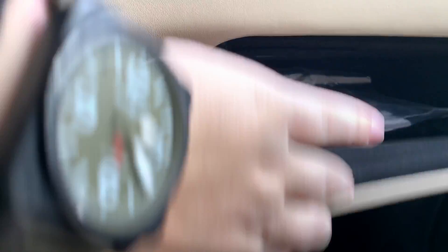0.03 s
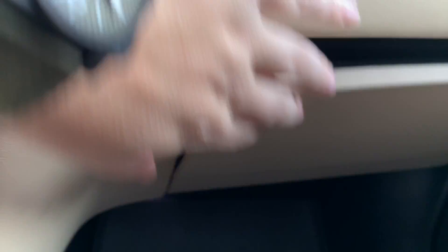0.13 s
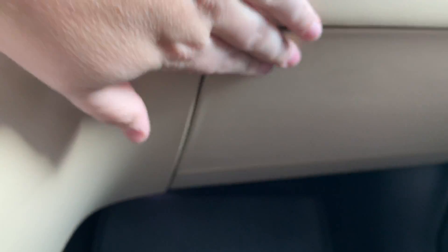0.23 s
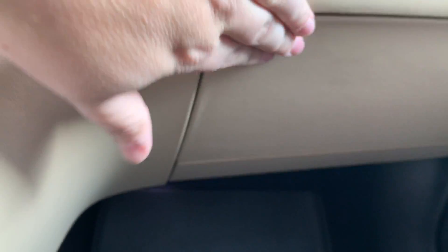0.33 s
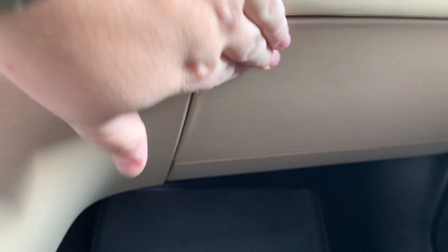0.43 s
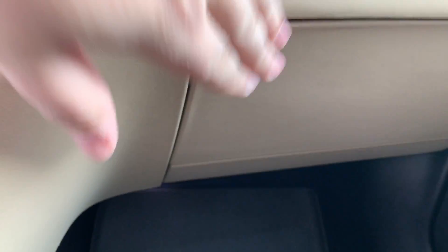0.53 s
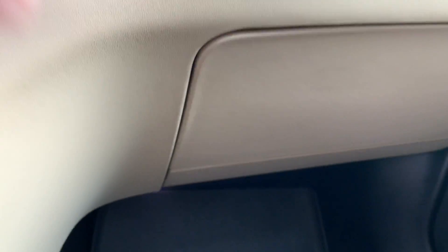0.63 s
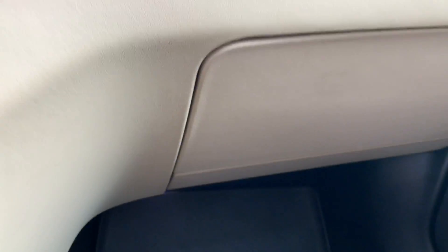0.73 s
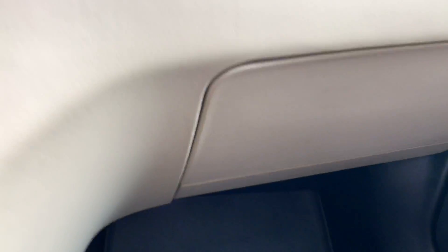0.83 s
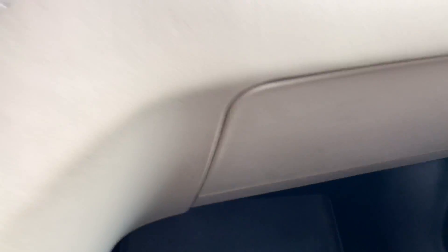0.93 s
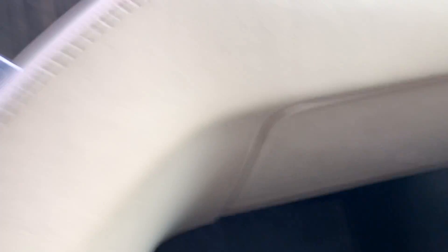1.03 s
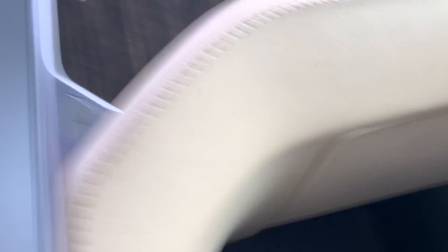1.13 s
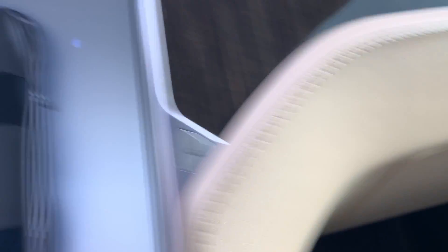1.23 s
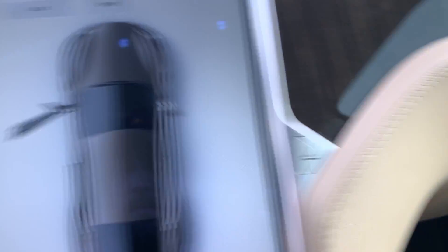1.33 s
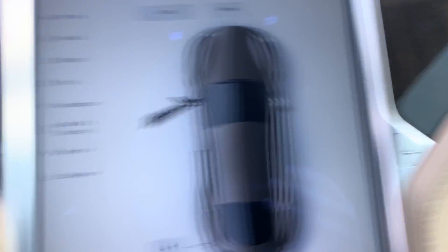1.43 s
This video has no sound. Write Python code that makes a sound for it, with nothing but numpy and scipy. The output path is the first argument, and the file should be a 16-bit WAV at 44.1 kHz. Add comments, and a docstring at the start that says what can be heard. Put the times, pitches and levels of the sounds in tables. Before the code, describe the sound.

A car glovebox is shut, heard close in stereo inside a parked cabin with steady low rumble and hum. Faint movement rustles first; at 0.2 s the plastic lid knocks and chatters, at 0.26 s the latch snaps brightly, with a boxy thump and faint spring ring. Dashboard shudder fades, fingers slide off near 0.45 s; tiny trim ticks follow from 0.7 s, and soft rustle rises by 1.4 s.

```python
"""A low cabin rumble and hum is heard first, under the rustle of movement in a parked car.
A plastic glovebox lid knocks against its stops, then the latch snaps home and its spring rings faintly.
The box thumps, the dashboard shudders, a faint ring swells, fingers slide off the lid and the trim ticks.
Rumble, rustle, slide and clatter are noise shaped in frequency bands; hum is wavering sines;
lid, latch, thumps and after-rings are sums of decaying sinusoidal modes."""
import sys
import numpy as np
from scipy import signal
from scipy.io import wavfile

SR = 44100
rng = np.random.default_rng(int(sys.argv[2]) if len(sys.argv) > 2 else 0)


def materialize(psi):
    """Save the field psi as 16-bit PCM at rate SR to the path in sys.argv[1].

    A 1-D psi becomes a single channel; in a 2-D psi each row is a channel.
    """
    bounded = np.clip(np.atleast_2d(psi).T, -1, 1)
    quanta = np.round(bounded * 32767).astype(np.int16)
    wavfile.write(sys.argv[1], SR, quanta)


N = 66150
T = np.arange(N) / SR  # time in s

# Steady rumble spectrum: pitch_hz, relative_density_db (dB per Hz)
RUMBLE_COLOUR = [(25, -33.5), (33, -24), (48, -2), (75, 2.5), (115, -12.5), (180, -17), (330, -22),
                 (600, -26), (1200, -34.5), (2500, -40), (6000, -48), (9000, -56.5), (15000, -62)]
# Left-right correlation of the cabin's sounds: pitch_hz, correlation (-1 to 1)
CABIN_CORRELATION = [(60, 1), (130, 0.8), (290, .88), (640, 0.4), (1400, 0.41), (15000, 0.083)]
# Hum lines: pitch_hz, level_db (mean rms, before pan), left_right_db
HUM_LINES = [(81.4, -46, 0), (268.2, -52, 8), (405.5, -67, 13)]
# Equal balance at every pitch: pitch_hz, left_right_db
CENTRE_BALANCE = [(20, 0), (20000, 0)]
# Rustle of movement: start_s, body_level_db, hiss_level_db
RUSTLE_LEVELS = [(0, -56, -64), (0.06, -56.5, -63), (0.11, -50, -54.5), (0.17, -50, -52), (0.2, -35.5, -57),
                 (0.3, -53.5, -72), (0.6, -62, -72.5), (0.75, -55, -70.5), (0.99, -69.5, -80),
                 (1.09, -55.5, -84.5), (1.21, -56.5, -73.5), (1.31, -53, -58.5), (1.41, -54, -49),
                 (1.48, -49.5, -47)]
# Spectrum of the rustle's body: pitch_hz, relative_density_db (dB per Hz)
RUSTLE_BODY_COLOUR = [(150, 3), (500, -3), (1000, 3), (2000, -0.5), (4000, -6), (6800, -8.5), (8700, -11),
                      (15000, -42)]
# Spectrum of the rustle's high hiss: pitch_hz, relative_density_db (dB per Hz)
RUSTLE_HISS_COLOUR = [(1000, -20), (4000, -7.5), (7000, -2), (10000, -0.5), (12000, 4.5), (15200, -2.5)]
# The lid meets its stops and chatters: start_s, clatter_db, push_db (relative drive of the lid's modes)
KNOCK_CONTACTS = [(0.2042, -17.5, 0.5), (0.2096, -14, -24.5), (0.2125, -13.5, -19.5),
                  (0.2223, -23.5, -24.5), (0.2273, -26, -23)]
# The latch rides over the striker and drops in: start_s, clatter_db, push_db (on the lid's modes)
SNAP_CONTACTS = [(0.2555, -16.5, -33), (0.2578, -10.5, -13.5), (0.262, -11.5, -27), (0.2644, -9, -32),
                 (0.2705, -29, -10.5), (0.291, -38, -36)]
# Modes of lid and box: pitch_hz, relative_level_db, t60_s, left_right_db
LID_RESONANCES = [(125, -20, 0.18, -2), (188, -16.5, 0.18, -3), (275, -18.5, 0.055, -6), (335, -13, .06, 4),
                  (368.7, -19, 0.11, 7.5), (436, -20, 0.023, 0.5), (483, -15.5, .06, -1.5),
                  (531, -18.5, 0.12, 5.5), (597.3, -13, 0.073, 3.5), (826.5, -16.5, 0.079, 0),
                  (987, -24, .1, -4.5), (1066.6, -20.5, 0.1, 4), (1589, -32, 0.21, -1),
                  (2592, -29, 0.18, -3)]
# Modes of the latch and its spring: pitch_hz, relative_level_db, t60_s, left_right_db
LATCH_RESONANCES = [(1077, -49.5, 0.91, 8), (1492, -21, 0.067, 12), (1977, -21, .085, 11.5),
                    (2200, -19.5, 0.067, -8), (2210, -51.5, 0.94, -1.5), (2340, -25.5, 0.089, -0.5),
                    (2583, -27, 0.089, -3.5), (2987, -24, 0.12, 9.5), (3870, -25, .075, -6.5),
                    (3940, -53, .5, -3.5), (3990, -49.5, 0.45, -3), (4760, -59, 1, -10.5),
                    (6340, -48, .6, 0), (6400, -54.5, 1, -10.5), (6525, -52, 1, 0.5), (6640, -59, .5, -4)]
# Dense ringing of the plastic at the stops: pitch_hz, relative_density_db (dB per Hz)
KNOCK_SPECTRUM = [(60, -14), (270, -2), (500, -5), (750, -8), (1250, -11), (1800, -3.5), (3500, -14.5),
                  (6500, -9.5), (8700, -16), (11000, -16), (13300, -24), (15500, -26)]
# Dense ringing of the plastic at the latch: pitch_hz, relative_density_db (dB per Hz)
SNAP_SPECTRUM = [(60, -15), (200, -15), (400, -7.5), (750, -5.5), (1250, -4.5), (2000, -1), (3500, -3.5),
                 (6500, -2.5), (8700, -4.5), (10500, -10.5), (13300, -20.5), (15500, -17)]
# Decay of the knocks' clatter: pitch_hz, t60_s
KNOCK_DECAY = [(100, .1), (1000, 0.11), (5000, 0.095), (14000, 0.057)]
# Decay of the latch's clatter: pitch_hz, t60_s
SNAP_DECAY = [(100, 0.42), (1000, 0.076), (5000, 0.069), (14000, 0.015)]
# Balance of the clatter: pitch_hz, left_right_db
CLATTER_BALANCE = [(100, 8), (400, 3), (1200, 5.5), (2400, 1), (4500, -5), (9000, 0), (15000, 2)]
# Left-right correlation of the clatter: pitch_hz, correlation (-1 to 1)
CLATTER_CORRELATION = [(100, .98), (400, .9), (1000, 0.26), (2200, -0.33), (5000, -0.011), (12000, -0.2)]
# Box and shut-in air, then the dashboard: start_s, pitch_hz, level_db (before rise and decay), rise_s, t60_s
THUMP_MODES = [(0.2135, 87.3, -8.5, 0.0078, 0.13), (0.266, 95.7, -9.5, .004, 0.056),
               (0.2685, 360, -9.5, 0.0046, 0.023), (0.303, 109, -18.5, 0.004, 0.07),
               (0.329, 46.3, -24, 0.0053, 0.45), (0.418, 50.8, -24, 0.0058, 0.21)]
# Ring as the hand lets go: start_s, pitch_hz, level_db (before rise and decay), rise_s, t60_s
AFTER_RING_MODES = [(0.388, 823.6, -47, 0.01, 0.56), (0.415, 1842, -55, 0.0081, 0.37),
                    (0.555, 808, -47, 0.009, 0.56)]
# Spectrum of the fingers' slide: pitch_hz, relative_density_db (dB per Hz)
SLIDE_SPECTRUM = [(500, -1), (2000, -12), (4000, -4.5), (7000, -2), (10500, 1), (15500, -6)]
# Small ticks of the trim: start_s, clatter_db
TRIM_TICKS = [(0.707, -45), (0.734, -49.5), (1.066, -49), (1.191, -49.5), (1.281, -46), (1.321, -47.5),
              (1.474, -42.5)]
# Spectrum of the ticks: pitch_hz, relative_density_db (dB per Hz)
TICK_SPECTRUM = [(200, -1.5), (1000, 8), (2000, -6.5), (4000, -3.5), (9000, -26), (15000, -27)]
# Decay of the ticks: pitch_hz, t60_s
TICK_DECAY = [(200, 0.13), (8000, 0.04)]
# Dips in the microphone's treble response: pitch_hz, width_hz, gain_db
TREBLE_DIPS = [(8750, 1000, -14), (13150, 700, -14), (13700, 700, -16)]

RUMBLE_DB = -38
HUM_WAVER_DB, HUM_WANDER_RAD = -2, 0.098  # random spread of level and phase
RUSTLE_GRAIN_DB, RUSTLE_GRAINS_PER_S = 2, 130
RIGHT_LAG_S = .00024  # the cabin's sounds reach the right side later
TAIL_DB, TAIL_T60_S = -44, .25  # the cabin's faint answer, relative to each contact
CRACK_DB, CRACK_T60_S = -2.5, 0.0047  # the instant of each contact, relative to its level
CRACKLE_DB, CRACKLE_PER_S = 0.5, 380  # tiny collisions roughen the clatter
BEND_DELAY_S, BEND_REFERENCE_HZ = .0045, 489.8  # group delay of bending waves at the reference pitch
RISE_CYCLES = 0.45  # time constant of a mode's build-up
DROP_S = .2585  # the latch drops behind the striker
SLIDE_S, SLIDE_WIDTH_S, SLIDE_DB = 0.446, 0.02, -50.5
STOPBAND_HZ = 16300


def from_db(db):
    """The decibel law: level in dB to amplitude gain; twice the level gives the power ratio."""
    return 10 ** (np.asarray(db) / 20)


def at_hz(points, hz):
    """Logarithmic pitch scale: interpolate a table along log frequency."""
    points = np.array(points)
    return np.interp(np.log(hz), np.log(points[:, 0]), points[:, 1])


def pan(db):
    """Intensity stereo: a level difference shared equally between left and right."""
    return from_db(np.array([[.5], [-.5]]) * db)


def drift(points_per_s):
    """Random modulation: Gaussian values of unit spread joined by straight lines."""
    return np.interp(T * points_per_s, np.arange(1024), rng.standard_normal(1024))


def decay(hits, t60):
    """Exponential decay: summed power of hits (start_s, level_db), each losing 60 dB in t60."""
    power = 0
    for start_s, db in hits:
        fade_db = 60 * np.clip((T - start_s) / t60, 0, 4)
        power = power + (T >= start_s) * from_db(2 * (db - fade_db))
    return power


def noise(colour, correlation, balance=CENTRE_BALANCE, envelope=lambda hz: 1):
    """Band-filtered noise, near unit rms before envelope and pan, with partial left-right correlation."""
    edges = np.geomspace(22, 17000, 27)
    white = rng.standard_normal((2, 2, N + 8000))  # the extra samples let the filters settle
    out, power = 0, 0
    for k, (low, high) in enumerate(zip(edges, edges[1:])):
        band = signal.butter(2, [low, high], "band", fs=SR, output="sos")
        # neighbouring bands draw on independent noise
        mid, side = signal.sosfilt(band, white[k % 2])[:, -N:]
        hz = np.sqrt(low * high)
        alike = np.clip(at_hz(correlation, hz), -.99, .99)
        gain = from_db(at_hz(colour, hz))
        pair = np.sqrt(1 + alike) * mid + np.sqrt(1 - alike) * np.array([side, -side])
        out = out + gain * envelope(hz) * pan(at_hz(balance, hz)) * pair
        power += gain ** 2 * (high - low) * 4 / SR
    return out / np.sqrt(power)


def rumble():
    """Broadband stationary noise: a steady low-frequency spectrum fills the cabin."""
    return from_db(RUMBLE_DB) * noise(RUMBLE_COLOUR, CABIN_CORRELATION)


def hum():
    """Random modulation of pure tones: a few lines waver in level and phase."""
    out = 0
    for hz, db, pan_db in HUM_LINES:
        amplitude = np.sqrt(2) * from_db(db + HUM_WAVER_DB * drift(8))
        phase = 2 * np.pi * hz * T + HUM_WANDER_RAD * drift(6.6)
        out = out + pan(pan_db) * amplitude * np.sin(phase)
    return out


def rustle():
    """Friction noise: an arm's movement gives a grainy body and a smoother high hiss."""
    start_s, body_db, hiss_db = np.transpose(RUSTLE_LEVELS)
    grain_db = RUSTLE_GRAIN_DB * drift(RUSTLE_GRAINS_PER_S)
    body_gain = from_db(np.interp(T, start_s, body_db) + grain_db)
    body = body_gain * noise(RUSTLE_BODY_COLOUR, CABIN_CORRELATION)
    hiss = from_db(np.interp(T, start_s, hiss_db)) * noise(RUSTLE_HISS_COLOUR, CABIN_CORRELATION)
    return body + hiss


def clatter(hits, colour, t60s):
    """High modal density: contacts crack, ring countless modes as decaying noise and leave a faint tail."""
    tail = from_db(2 * TAIL_DB) * decay(hits, TAIL_T60_S)
    crack = from_db(2 * CRACK_DB) * decay(hits, CRACK_T60_S)
    crackle = from_db(2 * CRACKLE_DB * drift(CRACKLE_PER_S))

    def envelope(hz):
        """Energies add: amplitude is the root of the summed powers."""
        return np.sqrt(crack + crackle * decay(hits, at_hz(t60s, hz)) + tail)

    return noise(colour, CLATTER_CORRELATION, CLATTER_BALANCE, envelope)


def ring(hits, modes):
    """Modal superposition: each hit excites all modes, with random strengths and dispersive phase lags."""
    out = np.zeros((2, N))
    spread_db = rng.normal(0, 1, (len(hits), len(modes)))
    for (start_s, db), spread in zip(hits, spread_db):
        age = np.maximum(T - start_s, 0)
        for k, (hz, mode_db, t60, pan_db) in enumerate(modes):
            fade_db = 60 * np.minimum(age / t60, 4)
            rise = 1 - np.exp(-age * hz / RISE_CYCLES)
            envelope = from_db(db + mode_db + spread[k] - fade_db) * rise
            # bending-wave phase grows as the root of frequency
            lag_cycles = 2 * BEND_DELAY_S * np.sqrt(hz * BEND_REFERENCE_HZ)
            out += pan(pan_db) * envelope * np.sin(2 * np.pi * (hz * age - lag_cycles))
    return out


def lid():
    """Impact excitation: knocks on the stops ring the lid, and the latch jolts its modes again."""
    knocks, contacts = np.array(KNOCK_CONTACTS), np.array(KNOCK_CONTACTS + SNAP_CONTACTS)
    knocking = clatter(knocks[:, :2], KNOCK_SPECTRUM, KNOCK_DECAY)
    return knocking + ring(contacts[:, ::2], LID_RESONANCES)


def swells(modes):
    """Transient resonance: each sinusoid builds up exponentially, then dies away."""
    out = 0
    for start_s, hz, db, rise_s, t60 in modes:
        age = np.maximum(T - start_s, 0)
        rise = 1 - np.exp(-age / rise_s)
        fade = np.exp(-np.log(1000) * age / t60)
        out = out - from_db(db) * rise * fade * np.sin(2 * np.pi * hz * age)
    return out


def thumps():
    """Low-frequency resonance: box and shut-in air thump, then the dashboard shudders."""
    return swells(THUMP_MODES)


def latch():
    """Impact and free vibration: bright contacts, then the drop sets catch and spring ringing."""
    snapping = clatter(np.array(SNAP_CONTACTS)[:, :2], SNAP_SPECTRUM, SNAP_DECAY)
    return snapping + ring([(DROP_S, 0)], LATCH_RESONANCES)


def after_rings():
    """Lightly damped resonance: a faint ring swells as the hand lets go."""
    return swells(AFTER_RING_MODES)


def slide():
    """Sliding friction: fingers leave the lid in one bell-shaped burst of noise."""
    swell = np.exp(-.5 * ((T - SLIDE_S) / SLIDE_WIDTH_S) ** 2)
    return from_db(SLIDE_DB) * swell * noise(SLIDE_SPECTRUM, CABIN_CORRELATION)


def ticks():
    """Small impacts: the trim ticks in short bursts of decaying noise."""
    return clatter(TRIM_TICKS, TICK_SPECTRUM, TICK_DECAY)


def scene():
    """Superposition and interaural delay: the cabin's sounds lag on the right, the glovebox does not."""
    left, right = rumble() + hum() + rustle() + slide() + ticks()
    around = np.array([left, np.interp(T - RIGHT_LAG_S, T, right)])
    return around + lid() + thumps() + latch() + after_rings()


def record(dry):
    """Linear filtering and saturation: the microphone dips in the treble, clips peaks and cuts the top."""
    for hz, width_hz, db in TREBLE_DIPS:
        b, a = signal.iirpeak(hz, hz / width_hz, fs=SR)
        dry = dry + (from_db(db) - 1) * signal.lfilter(b, a, dry)
    low_pass = signal.cheby2(20, 60, STOPBAND_HZ, fs=SR, output="sos")  # 60 dB down at the edge
    return signal.sosfilt(low_pass, np.clip(dry, -1, 1))


dry = scene()
out = record(dry)
materialize(out)
```